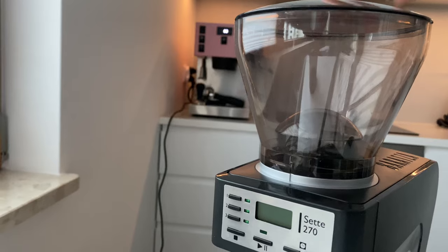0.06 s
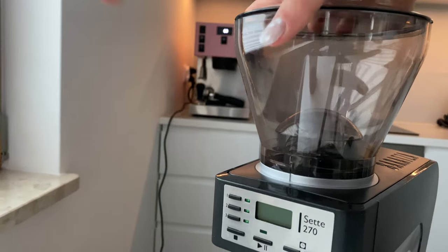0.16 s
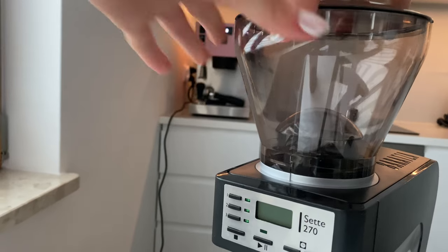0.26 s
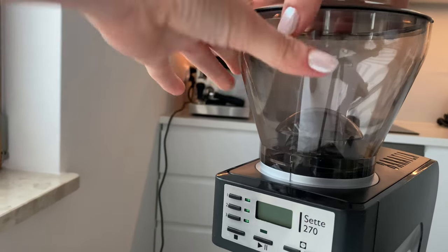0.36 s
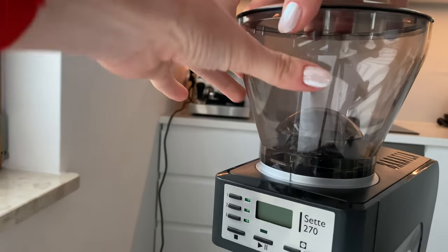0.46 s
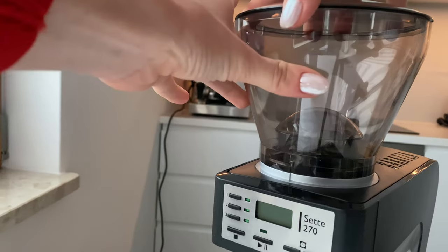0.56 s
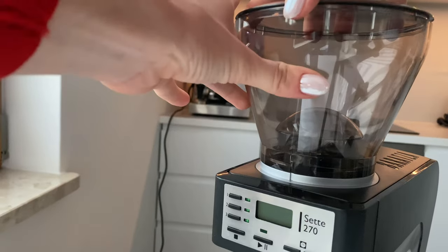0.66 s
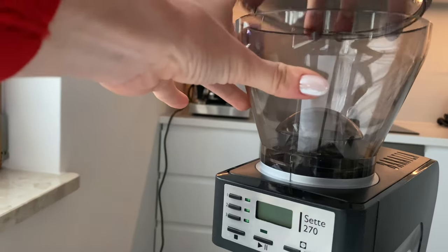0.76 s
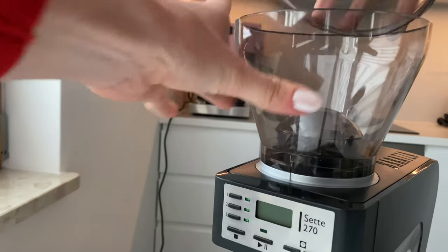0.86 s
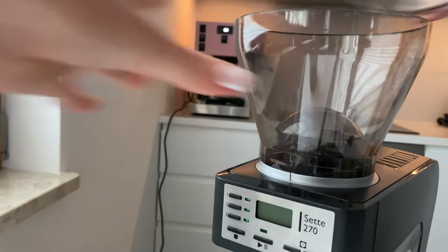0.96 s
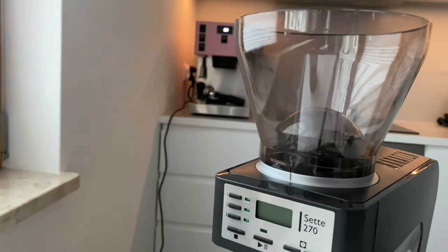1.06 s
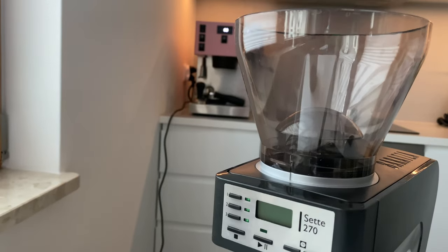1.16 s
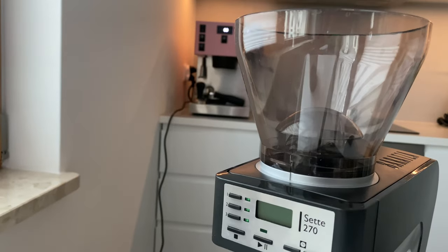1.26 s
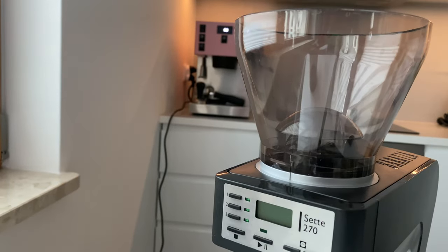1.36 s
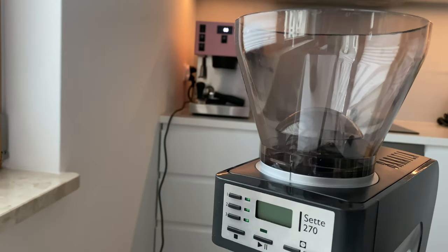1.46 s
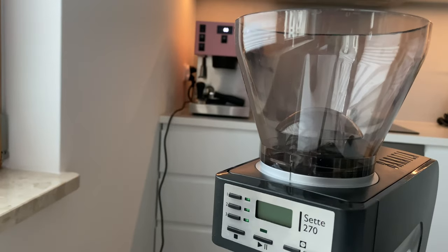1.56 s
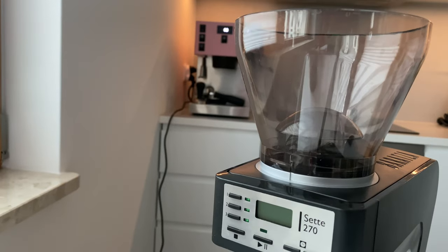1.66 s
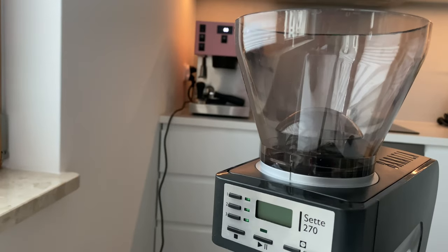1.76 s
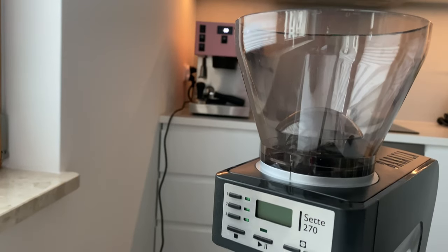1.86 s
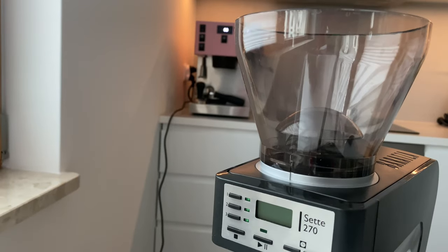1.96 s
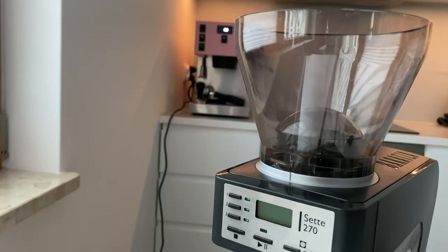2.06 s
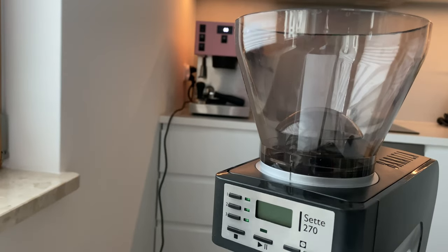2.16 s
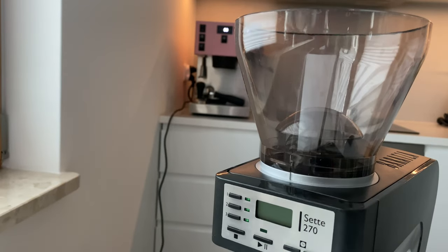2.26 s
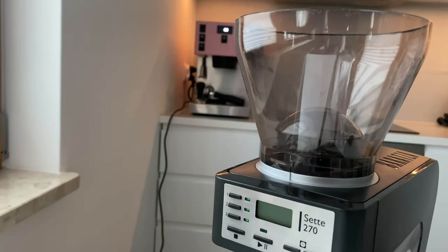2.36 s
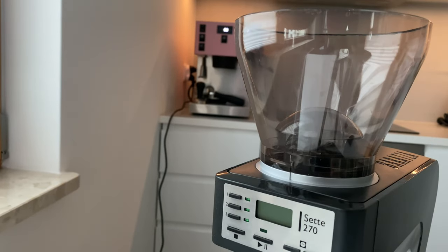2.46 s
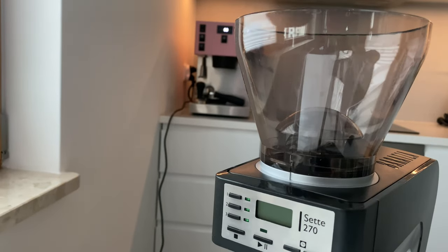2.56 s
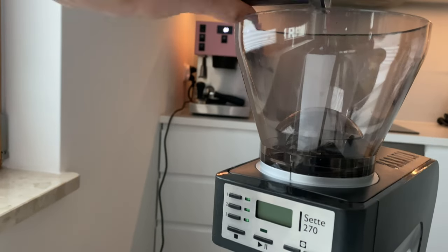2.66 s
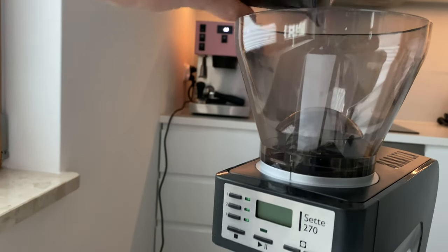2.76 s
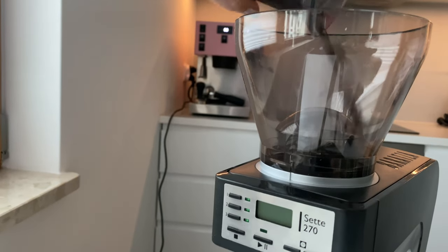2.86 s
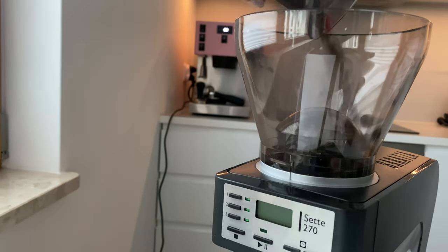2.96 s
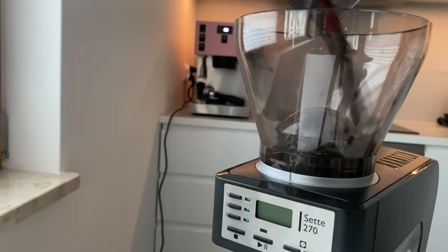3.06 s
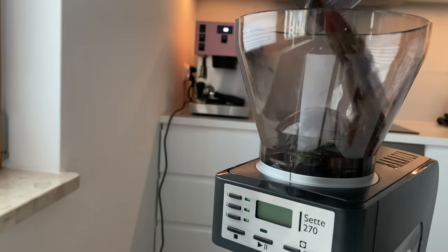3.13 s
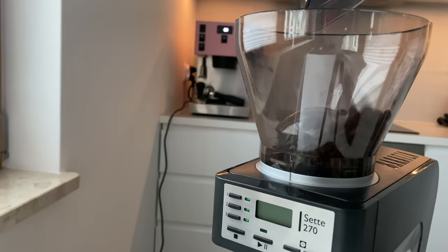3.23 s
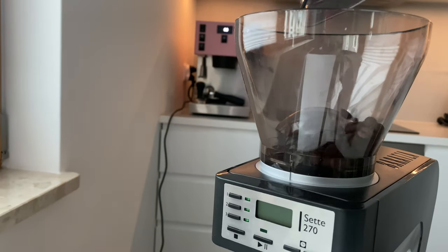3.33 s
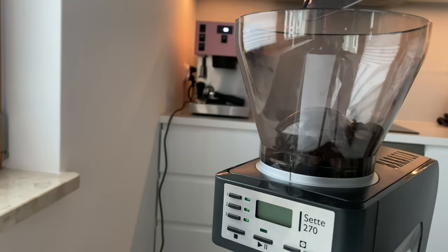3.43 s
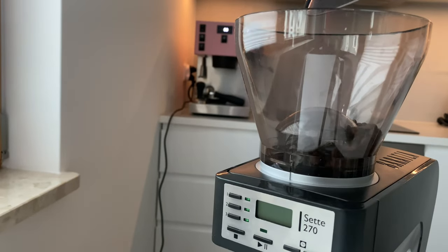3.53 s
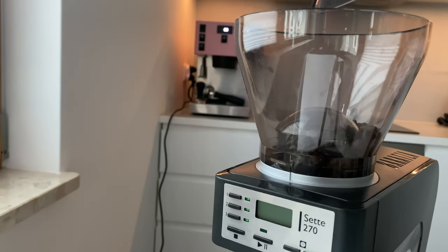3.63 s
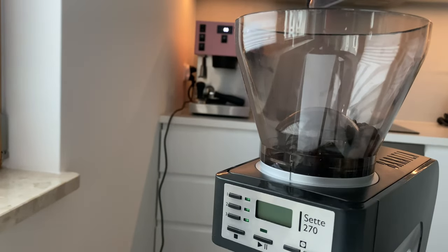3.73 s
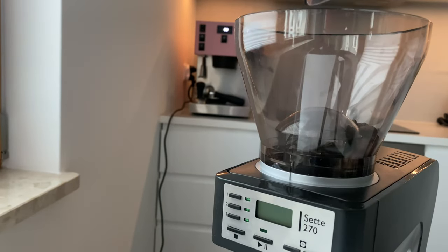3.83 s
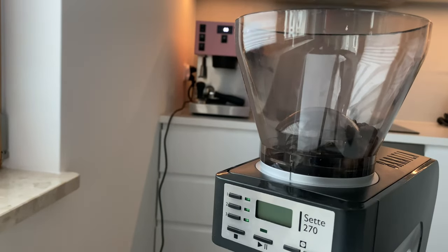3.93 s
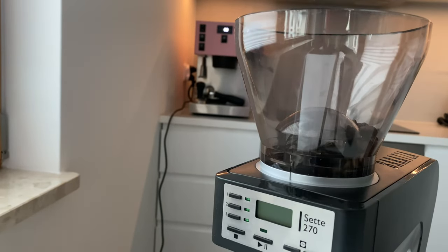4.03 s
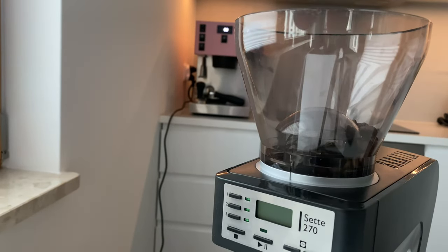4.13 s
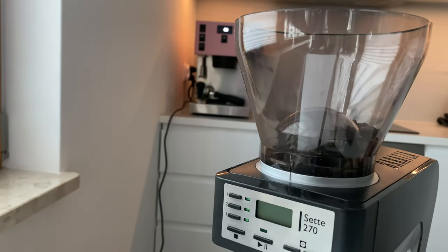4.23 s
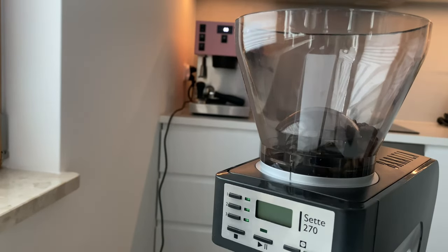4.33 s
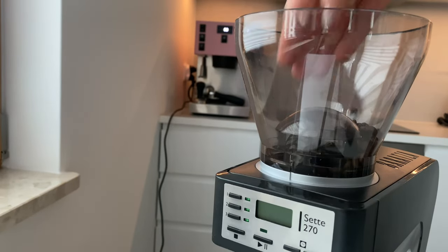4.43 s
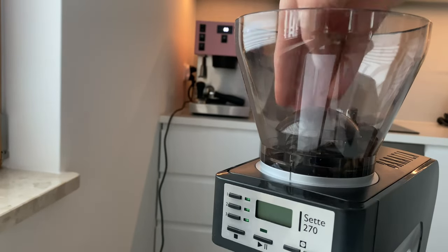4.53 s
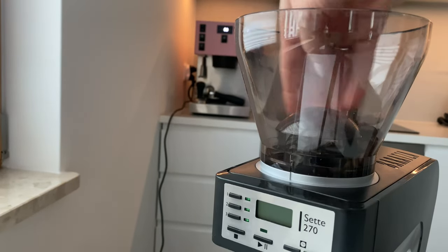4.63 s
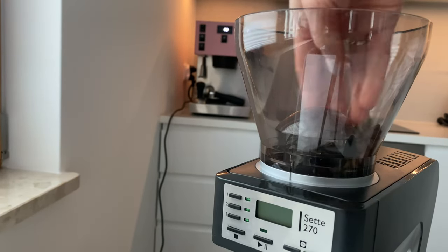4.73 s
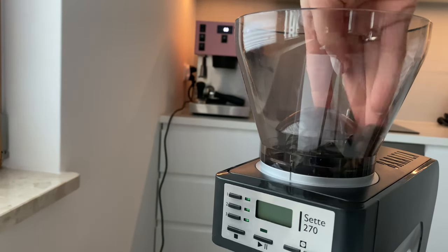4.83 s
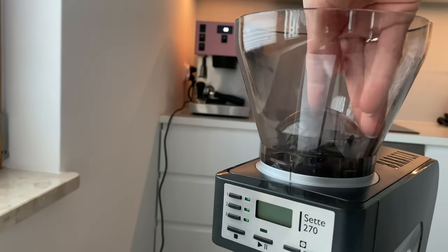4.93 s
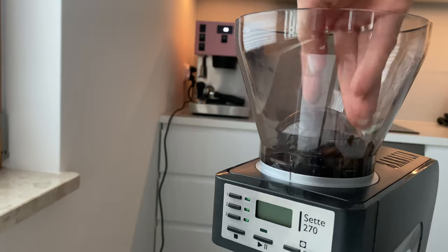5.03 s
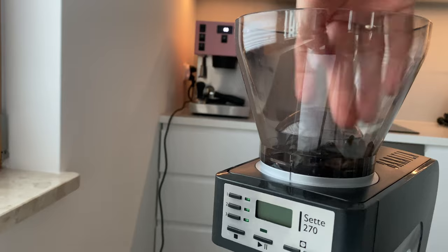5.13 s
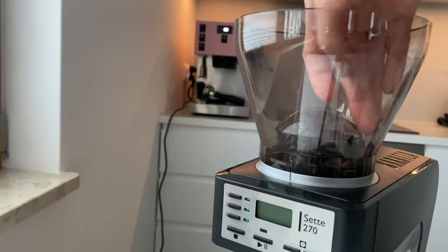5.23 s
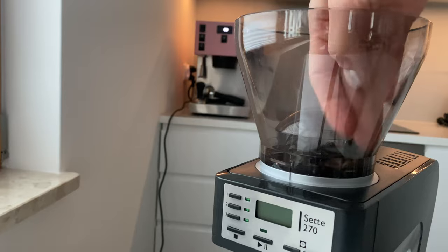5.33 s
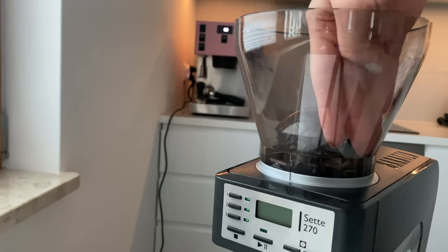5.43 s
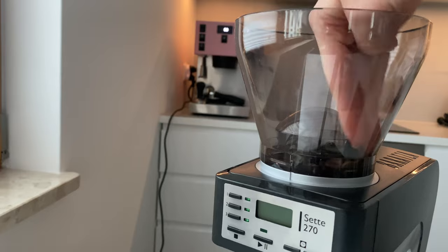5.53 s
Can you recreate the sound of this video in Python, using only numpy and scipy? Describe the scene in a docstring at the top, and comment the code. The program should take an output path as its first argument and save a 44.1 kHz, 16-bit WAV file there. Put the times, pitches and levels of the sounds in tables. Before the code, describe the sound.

A plastic lid knocks off a grinder hopper and is set down, then coffee beans rattle in and fingers stir them.

```python
"""Over quiet kitchen air and low rumble, a plastic lid knocks and scrapes on a coffee grinder's hopper rim.
It is lifted off and laid on the counter: each blow rings the modes (natural tones) of lid, grinder or counter.
Beans slide along a tilted container, pour into the hopper and trickle out; fingers then stir and pat the heap.
The beans are random tiny cracks and pitched clacks that ring the hopper's plastic wall and the air inside it.
Softer thumps give the beans weight; short random delays and echoes spread lid and beans in the room."""
import sys
import numpy as np
from scipy import signal
from scipy.fft import rfft, irfft
from scipy.io import wavfile
from scipy.ndimage import uniform_filter1d

SR = 44100
rng = np.random.default_rng(int(sys.argv[2]) if len(sys.argv) > 2 else 0)


def master_out(mix):
    """Clip the mix to full scale and print it as 16-bit PCM to the path in sys.argv[1]."""
    frames = np.transpose(np.atleast_2d(mix))
    ceiling = np.clip(frames, -1, 1)
    pcm = np.round(ceiling * 32767).astype(np.int16)
    wavfile.write(sys.argv[1], SR, pcm)


N = 246519
TIME = np.arange(N) / SR
TINY = 1e-18  # keeps fading filters away from extremely small, slow-to-compute numbers


def from_db(db):
    """Turn decibels into gain."""
    return 10 ** (np.asarray(db) / 20)


def rms_one(x):
    """Scale to unit rms."""
    return x / np.sqrt(np.mean(x ** 2) + 1e-20)


def at_hz(points, hz):
    """Read a table between its rows, on a log-frequency axis."""
    table_hz, values = np.array(points)[:, 0], np.array(points)[:, 1]
    return np.interp(np.log(hz + 1e-9), np.log(table_hz), values)


def convolve(x, response):
    """Pass a sound through an impulse response."""
    return signal.fftconvolve(x, response)[:N]


def colour(x, spectrum, size=4096):
    """Causal (minimum-phase) filter with the given spectrum and unit power gain."""
    level_db = at_hz(spectrum, np.fft.rfftfreq(size, 1 / SR))
    cepstrum = irfft(np.log(from_db(level_db)))
    # folding the cepstrum forward makes the filter respond as early as possible
    cepstrum[1:size // 2] *= 2
    cepstrum[size // 2 + 1:] = 0
    response = irfft(np.exp(rfft(cepstrum)))
    return convolve(x, response / np.linalg.norm(response))


def resonate(x, peaks, through, size=4096):
    """Parallel resonances beside a straight path of gain `through`; unit power gain."""
    click = signal.unit_impulse(size)
    response = through * click
    for hz, width, db in peaks:
        r = np.exp(-np.pi * width / SR)
        top = np.array([1, 0, -1]) * (1 - r * r) / 2
        bottom = [1, -2 * r * np.cos(2 * np.pi * hz / SR), r * r]
        response = response + from_db(db) * signal.lfilter(top, bottom, click)
    return convolve(x, response / np.linalg.norm(response))


def strike(times, levels_db, modes, vary_db, detune):
    """Each blow rings all the modes of a body, with strengths and a slight detuning of its own."""
    hz, db, t60 = np.transpose(modes)[:, :, None]
    t = TIME[:int(min(2 * t60.max(), 1) * SR)]
    out = np.zeros(N + SR)
    fade = np.exp(-np.log(1000) * t / t60)
    signs = (-1) ** np.arange(len(modes))  # neighbouring modes swing in opposite senses
    for s, level_db in zip(times, levels_db):
        strength, shift = rng.standard_normal((2, len(modes), 1))
        tones = np.sin(2 * np.pi * hz * (1 + detune * shift) * t)
        rings = from_db(level_db + db + vary_db * strength) * fade * tones
        start = int(s * SR)
        out[start:start + len(t)] += signs @ rings
    return out[:N] / np.linalg.norm(from_db(db))


def cracks(times, levels_db, decay):
    """Each contact chatters as a noise burst that fades with time constant `decay` in seconds."""
    kicks = np.zeros(N)
    kicks[(np.array(times) * SR).astype(int)] = from_db(levels_db)
    envelope = signal.lfilter([1], [1, -np.exp(-1 / (decay * SR))], kicks + TINY)
    return envelope * rng.standard_normal(N)


def uneven_kicks(per_s, spread_db):
    """Collisions at random moments, with random strengths."""
    born = rng.random(N) < per_s / SR
    return born * from_db(spread_db * np.minimum(rng.exponential(1, N), 4))


def collisions(per_s, spread_db, contact, even=0.085):
    """Random collisions of uneven strength, each a very short crack; steady rms near 1."""
    power = uneven_kicks(per_s, spread_db) ** 2
    power = signal.lfilter([1], [1, -np.exp(-2 / (contact * SR))], power + TINY)
    running_mean = uniform_filter1d(power, int(even * SR)) + 0.054 * power.mean()
    return np.sqrt(power / running_mean) * rng.standard_normal(N)


def strokes(rows, attack_s, release_db_per_s, swell_db_per_s=0):
    """Gain of (start, length, dB) strokes: attack, hold or swell, release; overlaps add in power."""
    power = 0
    for s, length, db in rows:
        age = TIME - s
        swell_db = swell_db_per_s * np.clip(age, 0, length)
        release_db = release_db_per_s * np.maximum(age - length, 0)
        gain = np.clip(age / attack_s, 0, 1) * from_db(db + swell_db - release_db)
        power = power + gain ** 2
    return np.sqrt(power)


# Colour of the kitchen's quiet air. Each row: frequency in Hz, relative level in dB.
AIR_COLOUR = [(20, -8), (100, -0.5), (300, -15.5), (1000, -17), (3000, -19), (7000, -19.5), (12000, -29.5),
              (16000, -47.5)]


def quiet_air():
    """Steady coloured noise, independent on the left and right."""
    return from_db(-73.5) * np.array([colour(white, AIR_COLOUR) for white in rng.standard_normal((2, N))])


# How long the kitchen echoes. Each row: frequency in Hz, time to fade by 60 dB in seconds.
KITCHEN_T60 = [(100, 0.14), (300, 0.52), (700, 0.34), (1500, 0.45), (5000, 0.34), (14000, 0.09)]
# How alike the two sides' echoes are. Each row: frequency in Hz, left-right likeness (1 = identical).
LIKENESS = [(100, 1), (300, 0.32), (700, .15), (1500, 0.12), (3000, .05), (14000, 0.097)]


def reflections():
    """Stereo response of diffuse echoes: bands of noise that die away, alike in the bass; unit energy."""
    t, out = TIME[:SR], 0
    edges = np.geomspace(50, 18000, 15)
    for low, high in zip(edges, edges[1:]):
        band = signal.butter(2, [low, high], "band", fs=SR, output="sos")
        mid, side = signal.sosfilt(band, rng.standard_normal((2, SR)))
        hz = np.sqrt(low * high)
        t60 = at_hz(KITCHEN_T60, hz)
        alike = np.clip(at_hz(LIKENESS, hz), -1, 1)
        fade = np.exp(-np.log(1000) * t / t60) / np.sqrt(t60)
        out = out + fade * (np.sqrt(1 + alike) * mid + np.sqrt(1 - alike) * side * [[1], [-1]])
    return out / np.sqrt(np.sum(out ** 2) / 2)


def spread_delays(x, delay_s, lag_s, treble_hz=2400, size=4096):
    """Short random delays, growing towards the treble, spread the sound on top of a common lag."""
    hz = np.fft.rfftfreq(size, 1 / SR)
    random_share = uniform_filter1d(rng.exponential(1, len(hz)), size=4)
    delays = lag_s + delay_s * np.minimum(hz / treble_hz, 1) ** 2 * random_share
    phase = 2 * np.pi * np.cumsum(delays) * SR / size  # phase is delay summed over frequency
    return convolve(x, irfft(np.exp(-1j * phase))[:size // 2])


def kitchen(x, room_db, delay_s, left_lead_s):
    """Each side gets the direct sound with its own random delays, one side slightly late, plus the room."""
    lags = (-left_lead_s, left_lead_s)
    direct = np.array([spread_delays(x, delay_s, max(lag_s, 0)) for lag_s in lags])
    echoes = np.array([convolve(x, side) for side in reflections()])
    return direct + from_db(room_db) * echoes


# Soft pushes that rock the grinder and counter.
# Each row: start in seconds, length in seconds, pitch in Hz, level in dB.
BUMPS = [(0.169, 0.079, 84.4, -37.5), (0.278, 0.046, 109, -48.5), (0.89, 0.077, 103, -48.5),
         (1.08, 0.039, 110, -53), (1.662, 0.062, 120, -49.5), (2.66, 0.07, 92, -45),
         (4.533, 0.1515, 90.2, -47.5), (4.705, 0.082, 88, -60), (4.855, 0.068, 95.5, -63)]
# Rumbling shakes of the grinder and counter. Each row: start in seconds, length in seconds, level in dB.
SHAKES = [(0.17, 0.062, -58.5), (1.66, .03, -64.5), (0.41, .25, -58), (0.69, 0.19, -53.5),
          (1.82, 0.18, -51.5), (2.66, 0.038, -49), (4.52, .03, -62.5)]
# Colour of that rumble. Each row: frequency in Hz, relative level in dB.
RUMBLE_COLOUR = [(20, -16.5), (50, -4.5), (100, 4.5), (190, -4.5), (320, -9), (600, -19), (2000, -41.5)]
# Faint rumble while the arms move about.
MOVING_START_S, MOVING_LENGTH_S, MOVING_DB = 0.0041, 3.83, -71


def handling():
    """Soft pushes rock the grinder as low tones; each shake leaves a low rumble that dies away."""
    mid, side = [colour(white, RUMBLE_COLOUR) for white in rng.standard_normal((2, N))]
    shaking = [*SHAKES, (MOVING_START_S, MOVING_LENGTH_S, MOVING_DB)]
    rumble = strokes(shaking, attack_s=0.022, release_db_per_s=51)
    out = rumble * (mid + from_db(-7) * side * [[1], [-1]])
    for s, length, hz, db in BUMPS:
        swell = np.sin(np.pi * np.clip((TIME - s) / length, 0, 1))
        out = out + from_db(db) * swell * np.sin(2 * np.pi * hz * (TIME - s))
    return out


# The gripped lid knocking on the hopper rim. Each row: time in seconds, then relative levels in dB
# of the tick, the lid's ring and the grinder's thud, and last the ring pitch in Hz.
LID_KNOCKS = [(0.16, -48.5, -43, -56.5, 1130), (0.186, -65, -44, -49.5, 750),
              (0.417, -40.5, -32, -28, 1127), (0.422, -40.5, -30.5, -26.5, 1300),
              (0.533, -45, -41.5, -32.5, 776), (0.623, -33.5, -36, -48, 1590),
              (0.629, -42, -34, -47.5, 2015), (0.641, -52, -52.5, -37, 1390),
              (0.659, -54.5, -49.5, -32, 1130), (0.692, -34, -34.5, -28.5, 1620),
              (0.698, -29, -24.5, -20, 1438), (0.847, -48, -41, -41.5, 1620), (0.901, -41, -33.5, -42, 826)]
# Fingers touching the lifted lid. Each row: time in seconds, tick level in dB, relative ring level in dB.
LID_TOUCHES = [(0.903, -38.5, -31), (1.027, -75, -50.5), (1.086, -56, -46), (1.114, -54.5, -54),
               (1.19, -87, -61.5), (1.306, -42.5, -46), (1.475, -68, -48)]
# The lid sliding over the rim or in the hand.
# Each row: start in seconds, length in seconds, relative level in dB.
RUB = [(0.155, 0.011, -50.5), (0.78, 0.12, -54), (1.02, 0.093, -64.5), (1.18, 0.23, -71.5),
       (1.455, 0.03, -52), (1.64, .09, -75.5)]
# Tones of the free lid. Each row: pitch in Hz, relative level in dB, time to fade by 60 dB in seconds.
LID_MODES = [(901, -10, 0.073), (1090, -5.5, .05), (1227, -0.5, 0.029), (1346, 1.5, 0.098),
             (1385, -22, 0.68), (1430, -6, .04), (1644, -16.5, .05), (1858, 0, 0.061), (1885, -30, 0.33),
             (1957, -16, 0.056), (2210, -18, .07), (2860, -17, 0.076), (3310, -16.5, .06)]
# The gripped lid is damped and its pitch follows the grip.
# Each row: multiple of the ring pitch, relative level in dB, time to fade by 60 dB in seconds.
GRIPPED_MODES = [(.72, -7, .04), (1, 5.5, 0.037), (1.17, -14, 0.034), (1.4, -8.5, .03)]
# Tones of the grinder body. Each row: pitch in Hz, relative level in dB, time to fade by 60 dB in seconds.
GRINDER_MODES = [(122.4, -12, .2), (185.6, -4.5, 0.098), (237, 1.5, 0.073), (303, 0, .05), (450, -3, 0.038),
                 (548, -5, 0.14), (645, -2.5, 0.03), (895, -15.5, 0.06)]
# Colour of ticks and rubbing. Each row: frequency in Hz, relative level in dB.
TICK_COLOUR = [(200, -12), (700, 4), (2000, 3.5), (3500, -5), (5000, -3.5), (8000, -15), (16000, -16)]


def lid_friction(knock_times, thud_db):
    """After each knock the lid scrapes on along the rim; it also rubs, and both ring it faintly."""
    scrape_rows = [(at, 0, db) for at, db in zip(knock_times, thud_db)]
    scrape = strokes(scrape_rows, attack_s=.004, release_db_per_s=238)
    rub = strokes(RUB, attack_s=0.014, release_db_per_s=259)
    motion = from_db(-24.0) * scrape + from_db(-1.5) * rub
    friction = motion * collisions(per_s=470, spread_db=1.0, contact=0.0015)
    lid = strike([0], [0], LID_MODES, vary_db=3.5, detune=0)[:SR]
    lid_ring = convolve(friction, lid / np.linalg.norm(lid))
    return colour(friction, TICK_COLOUR) + from_db(-3.5) * lid_ring


def lid_lifted():
    """The gripped lid knocks and scrapes on the rim and the grinder thuds; once lifted, it rings freely."""
    s, tick_db, ring_db, thud_db, ring_hz = np.transpose(LID_KNOCKS)
    touch_s, touch_tick_db, touch_ring_db = np.transpose(LID_TOUCHES)
    knock_ticks = cracks(s, tick_db + 5, decay=0.0055)
    touch_ticks = cracks(touch_s, touch_tick_db, decay=0.002)
    ring = strike(touch_s, touch_ring_db, LID_MODES, vary_db=-1.0, detune=.008)
    for at, db, hz in zip(s, ring_db, ring_hz):
        gripped = np.array(GRIPPED_MODES) * [hz, 1, 1]
        ring = ring + strike([at], [db + 5.0], gripped, vary_db=-1.5, detune=0.015)
    thud = strike(s, thud_db + 8.0, GRINDER_MODES, vary_db=0.4, detune=0.023)
    return colour(knock_ticks + touch_ticks, TICK_COLOUR) + ring + thud + lid_friction(s, thud_db)


# The lid landing on the counter. Each row: time in seconds, relative level in dB.
LID_LANDING = [(1.8278, -18.5), (1.8321, -15), (1.861, -15.5), (1.876, -23.5)]
# Tones of the counter. Each row: pitch in Hz, relative level in dB, time to fade by 60 dB in seconds.
COUNTER_MODES = [(85, -14.5, .4), (115, -4, 0.23), (186, -3.5, 0.96), (224.5, -18.5, 0.87),
                 (279.4, -13.5, 0.0754), (346.5, -1.5, 0.19), (413, 3, 0.044), (555, 2.5, 0.1),
                 (750, 4.5, 0.0824)]
# Colour of the landing clatter. Each row: frequency in Hz, relative level in dB.
LANDING_COLOUR = [(200, -6.5), (1200, 7), (3300, 1), (5000, -8.5), (7000, -13.5), (10000, -45.5),
                  (16000, -53)]


def lid_laid_down():
    """One edge of the lid lands, then the other: the lid rings, the contact clatters, the counter booms."""
    s, db = np.transpose(LID_LANDING)
    ring = strike(s, db + 4, LID_MODES, vary_db=1.5, detune=.012)
    boom = strike(s, db - 9.5, COUNTER_MODES, vary_db=4.5, detune=0.02)
    return ring + boom + colour(cracks(s, db - 7.5, decay=0.0045), LANDING_COLOUR)


# Resonances of the hopper's plastic wall. Each row: pitch in Hz, width in Hz, relative level in dB.
WALL = [(2073, 120, 0.5), (2560, 47, 1.5), (2632, 65, 2), (2730, 57, 5), (3261, 140, 6.5),
        (3670, 120, -2.5), (3860, 66, -2), (4247, 54, -2), (4692, 63, 6.5), (5040, 130, 4.5), (5064, 68, 4),
        (5350, 170, 6.5), (5830, 94, 7), (6690, 750, 0.5)]


def hopper(clicks, knocks, spectrum, cavity, through=0.78, lowest_hz=560):
    """Clicks ring the plastic wall; knocks sound the cavity; all is cut below the cavity's lowest mode."""
    wall = colour(resonate(clicks, WALL, through), spectrum)
    hollow = resonate(knocks, cavity, through=0.022)
    return signal.sosfilt(signal.butter(4, lowest_hz, "high", fs=SR, output="sos"), wall + hollow)


def clacks(per_s, spread_db, cycles, count=20):
    """Each colliding bean rings for a few cycles at one of `count` pitches; steady rms near 1."""
    kicks = uneven_kicks(per_s, spread_db) * rng.choice([-1, 1], N)
    dealt, out = rng.integers(0, count, N), 0
    for k, hz in enumerate(np.linspace(1500, 15500, count)):
        w = 2 * np.pi * hz / SR
        r = np.exp(-np.log(1000) * hz / (cycles * SR))  # fades by 60 dB in `cycles` cycles
        top = [0, np.sin(w) * np.sqrt(1 - r * r)]
        out = out + signal.lfilter(top, [1, -2 * r * np.cos(w), r * r], kicks * (dealt == k) + TINY)
    return out / np.sqrt(uniform_filter1d(out ** 2, size=1500) + .05 * np.mean(out ** 2))


def rattle(gain, spectrum, cavity, per_s, spread_db, click_db, knock_db, follows, through,
           soft_hz=6500, dulling=0.56):
    """Streaming beans crack and clack; slow ones sound duller and their hollow sound swings less in dB."""
    grains = collisions(per_s, spread_db, contact=.0007)
    pitched = rms_one(grains + from_db(-4.0) * clacks(per_s, spread_db, cycles=19))
    speed = gain / gain.max()
    soft = signal.sosfiltfilt(signal.butter(2, soft_hz, fs=SR, output="sos"), pitched)
    clicks = gain * (soft + (pitched - soft) * speed ** dulling)
    knocks = gain.max() * speed ** follows * grains
    return hopper(clicks * from_db(click_db), knocks * from_db(knock_db), spectrum, cavity, through)


def taps(events, spectrum, cavity, click_db, knock_db, decay):
    """Single harder contacts, each a sharp click and a hollow knock."""
    s, db = np.transpose(events)
    return hopper(cracks(s, db + click_db, decay), cracks(s, db + knock_db, decay), spectrum, cavity)


# Flow along the tilted container. Each row: time in seconds, relative level in dB.
SLIDE = [(2.23, -65), (2.412, -61), (2.638, -29.5), (2.652, -33), (2.668, -26.5), (2.714, -35.5),
         (2.846, -41), (2.87, -47)]


def slide_flow(edge=.004):
    """Sliding strength: a level curve turned into gain, silent outside its span."""
    s, db = np.transpose(SLIDE)
    inside = np.clip(np.minimum(TIME - s[0], s[-1] - TIME) / edge + 1, 0, 1)
    return inside * from_db(np.interp(TIME, s, db))


# Gushes start at once, swell as the container tips and die away.
# Each row: start in seconds, length in seconds, relative level in dB.
GUSHES = [(2.878, .055, -22), (2.976, .2, -22)]
# The last beans trickle evenly, then thin out.
# One row: start in seconds, even length in seconds, relative level in dB.
TRICKLE = (3.326, 0.28, -32.5)
# Once the container is empty, the trickle fades at this rate on top of its thinning.
EMPTY_S, SETTLING_DB_PER_S = 3.923, 172
# Finger strokes through the heap. Each row: start in seconds, length in seconds, relative level in dB.
STIR = [(4.642, 0.081, -40), (4.72, 0.17, -39.5), (4.89, 0.076, -36.5), (5.02, 0.072, -45.5),
        (5.333, 0.014, -56), (5.42, 0.11, -59.5), (5.51, 0.035, -50)]


def bean_flows():
    """How strongly the beans move as they slide, pour, trickle and are stirred."""
    pour = strokes(GUSHES, attack_s=0.0091, release_db_per_s=105, swell_db_per_s=26.5)
    settling = from_db(-SETTLING_DB_PER_S * np.maximum(TIME - EMPTY_S, 0))
    trickle = settling * strokes([TRICKLE], attack_s=0.082, release_db_per_s=36)
    stir = strokes(STIR, attack_s=0.0055, release_db_per_s=265)
    return slide_flow(), pour, trickle, stir


# Fingers patting the heap, more hollow than sharp. Each row: time in seconds, relative level in dB.
PATS = [(4.649, -43), (4.863, -37.5), (4.979, -45.5), (5.172, -35.5), (5.348, -35), (5.421, -36.5),
        (5.517, -40.5)]
# Colour of the beans' weight on the grinder. Each row: frequency in Hz, relative level per Hz in dB.
THUMP_COLOUR = [(20, -15.5), (90, 2), (200, -5), (330, 2.5), (450, -7.5), (1000, -30.5)]


def weight(pour, trickle, stir):
    """Falling, pushed and patted beans thump dully on the grinder."""
    pats = strokes([(s, 0, db) for s, db in PATS], attack_s=.005, release_db_per_s=110)
    load = from_db(-32) * pour + from_db(-29) * trickle + from_db(-44) * stir + from_db(-28) * pats
    return load * colour(collisions(per_s=400, spread_db=1, contact=0.0017), THUMP_COLOUR)


# Air resonances of the pouring container, the open hopper and the hopper with a hand in it.
# Each row: pitch in Hz, width in Hz, relative level in dB.
CONTAINER = [(756, 120, 0.5), (1130, 150, -10.5), (1310, 170, 1.5), (1650, 150, -7)]
HOLLOW = [(605, 50, -6), (663, 40, -10.5), (820, 37, -3.5), (827, 41, 1), (1041, 27, -5), (1160, 47, -5.5),
          (1300, 70, -7.5), (1620, 85.5, -9.5)]
HOLLOW_WITH_HAND = [(588, 15, -0.5), (603, 29, -10), (770, 50, -1), (803, 45, 4), (1116, 53, -6.5),
                    (1290, 190, -6.5), (1830, 750, -13.5)]
# Colours of the bean contacts. Each row: frequency in Hz, relative level per Hz in dB.
SLIDE_COLOUR = [(500, -14.5), (1200, -15.5), (2500, -4), (4500, 1), (7000, -0.5), (11000, -3.5),
                (16000, -14.5)]
POUR_COLOUR = [(500, -19), (1200, -3.5), (2500, 0), (4500, 2.5), (7000, -0.5), (11000, 4), (16000, -8)]
TRICKLE_COLOUR = [(500, -16), (1200, -8.5), (2500, -4.5), (4500, 4), (7000, -5), (11000, -3.5),
                  (16000, -16)]
STIR_COLOUR = [(500, -16), (1200, -8.5), (2500, 1.5), (4500, 1.5), (7000, -3), (11000, -3), (16000, -20.5)]


def bean_streams(slide, pour, trickle, stir):
    """Beans slide, pour, trickle and are stirred, each stream with its own colour and hollow sound."""
    sliding = rattle(slide, SLIDE_COLOUR, CONTAINER, per_s=3000, spread_db=5,
                     click_db=3.0, knock_db=-15.5, follows=0.6, through=3.7)
    pouring = rattle(pour, POUR_COLOUR, HOLLOW, per_s=2100, spread_db=3.3,
                     click_db=1.93, knock_db=-12, follows=0.91, through=1.0)
    trickling = rattle(trickle, TRICKLE_COLOUR, HOLLOW, per_s=1500, spread_db=3.5,
                       click_db=0.73, knock_db=-20, follows=0.47, through=1.0)
    stirring = rattle(stir, STIR_COLOUR, HOLLOW_WITH_HAND, per_s=1300, spread_db=4.5,
                      click_db=2.5, knock_db=-12, follows=0.52, through=1.15)
    return sliding + pouring + trickling + stirring


# Single beans striking the wall. Each row: time in seconds, relative level in dB.
BEAN_HITS = [(2.334, -52.5), (2.459, -45), (2.522, -35.5), (2.579, -33.5), (2.839, -36), (2.878, -20.5),
             (2.976, -15), (3.418, -27), (3.585, -22.5), (3.625, -29.5), (3.689, -31), (3.804, -32.5),
             (3.932, -47), (3.985, -39), (4.513, -45.5), (4.529, -35.5), (4.72, -29.5), (4.827, -24),
             (4.891, -28.5), (5.023, -27.5), (5.118, -38.5), (5.162, -37.5), (5.513, -37)]
HAND_IN_S = 4.4  # from then on a hand is inside the hopper
# The container knocks as it is picked up and as it is shaken empty.
# Each row: time in seconds, relative level in dB.
CONTAINER_KNOCKS = [(2.222, -51), (3.848, -42)]
# The front of the gush hits the hopper floor. One row: time in seconds, relative level in dB.
FIRST_IMPACT = (2.889, -23)


def single_contacts():
    """Hard bean strikes, container knocks, the first impact and finger pats stand out of the streams."""
    open_hits = [hit for hit in BEAN_HITS if hit[0] < HAND_IN_S]
    hand_hits = [hit for hit in BEAN_HITS if hit[0] >= HAND_IN_S]
    return (taps(open_hits, POUR_COLOUR, HOLLOW, click_db=5.0, knock_db=-20.5, decay=0.0046)
            + taps(hand_hits, STIR_COLOUR, HOLLOW_WITH_HAND, click_db=1.0, knock_db=-11.5, decay=0.0057)
            + taps(CONTAINER_KNOCKS, SLIDE_COLOUR, HOLLOW, click_db=-5, knock_db=2.5, decay=0.0036)
            + taps([FIRST_IMPACT], POUR_COLOUR, HOLLOW, click_db=9.5, knock_db=2.5, decay=0.017)
            + taps(PATS, STIR_COLOUR, HOLLOW_WITH_HAND, click_db=-6, knock_db=4.0, decay=0.0068))


# How the hopper radiates to the two sides. Each row: frequency in Hz, left minus right level in dB.
HOPPER_BALANCE = [(100, 3.5), (350, -3.5), (580, 4), (700, 2), (900, 10.5), (1100, 5.5), (2700, 1),
                  (4700, 3.5), (7200, 1.5), (10000, 2)]


def beans_in_hopper():
    """All bean sounds in the kitchen, leaning left or right by frequency as the hopper radiates them."""
    slide, pour, trickle, stir = bean_flows()
    beans = bean_streams(slide, pour, trickle, stir) + single_contacts() + weight(pour, trickle, stir)
    left, right = kitchen(beans, room_db=-5, delay_s=0.0011915, left_lead_s=.00004)
    left_tilt = [(hz, db / 2) for hz, db in HOPPER_BALANCE]
    right_tilt = [(hz, -db / 2) for hz, db in HOPPER_BALANCE]
    return np.array([colour(left, left_tilt), colour(right, right_tilt)])


def scene():
    """Beans, lid, handling and quiet air together; the dB pairs are left and right trims."""
    rattling = beans_in_hopper()
    lifted = kitchen(lid_lifted(), room_db=-6.5, delay_s=0.0011, left_lead_s=.00005)
    laid = kitchen(lid_laid_down(), room_db=-5.0, delay_s=.0012, left_lead_s=-.00011)
    lid = lifted * from_db([[-.4], [.4]]) + laid * from_db([[-1.8], [.2]])
    return rattling + lid + handling() + quiet_air()


def record(dry):
    """The top is cut steeply above 16100 Hz."""
    return signal.sosfilt(signal.ellip(12, .1, 80, 16100, fs=SR, output="sos"), dry)


dry = scene()
out = record(dry)
master_out(out)
```